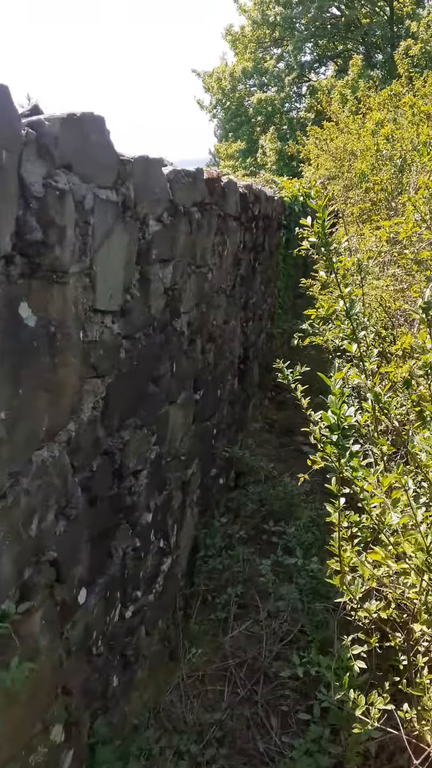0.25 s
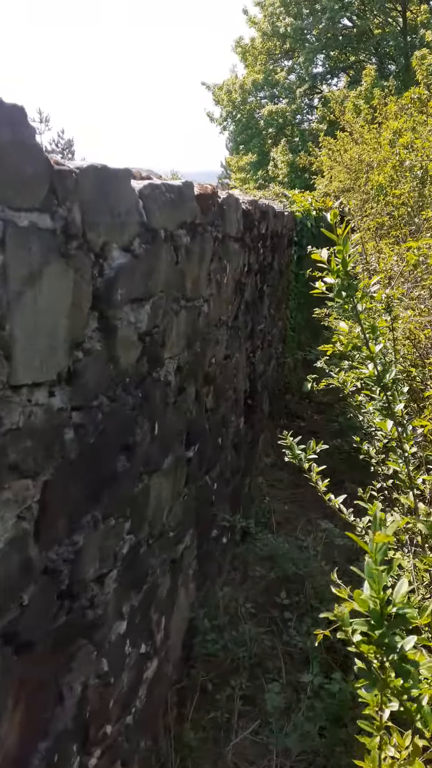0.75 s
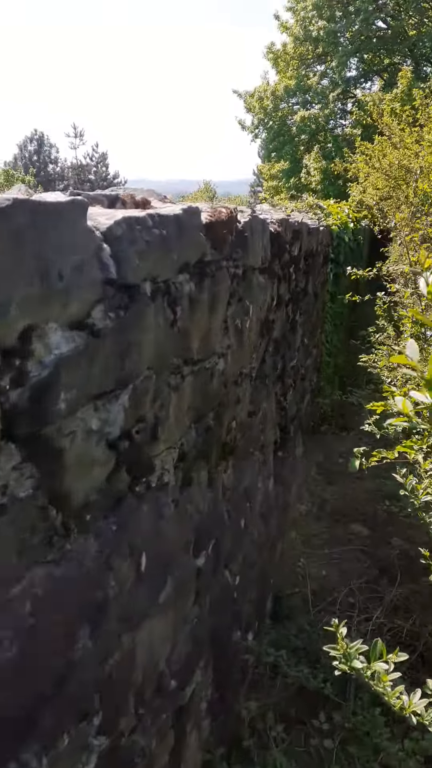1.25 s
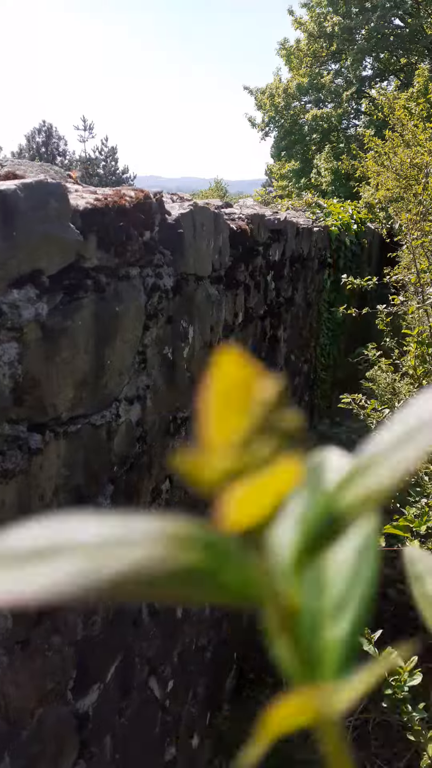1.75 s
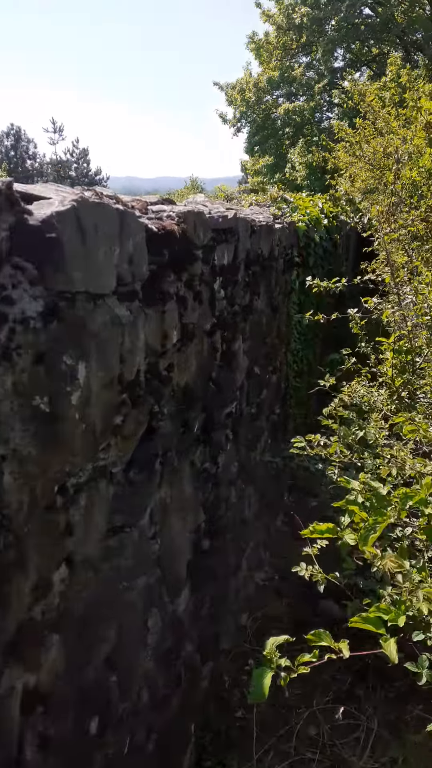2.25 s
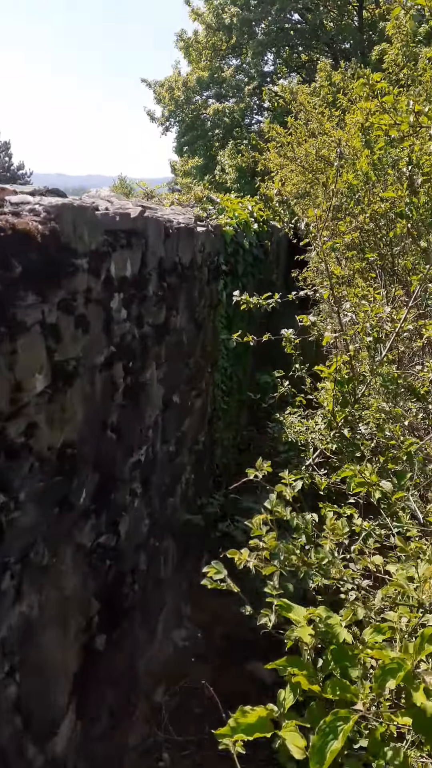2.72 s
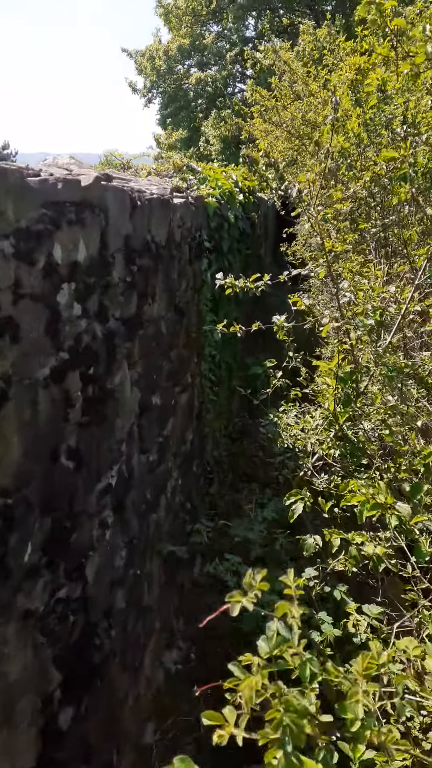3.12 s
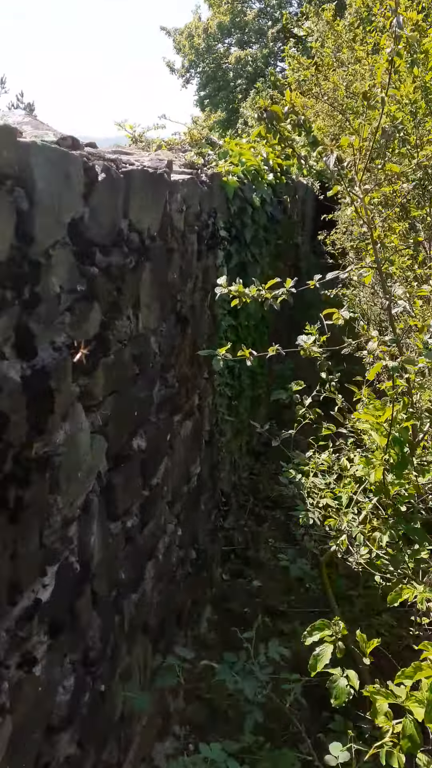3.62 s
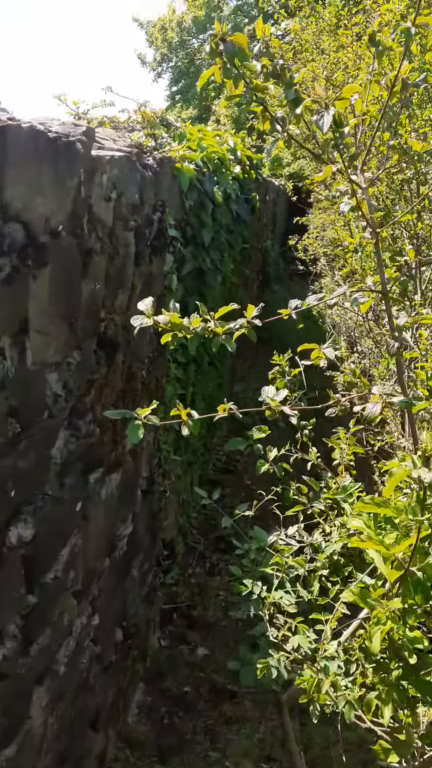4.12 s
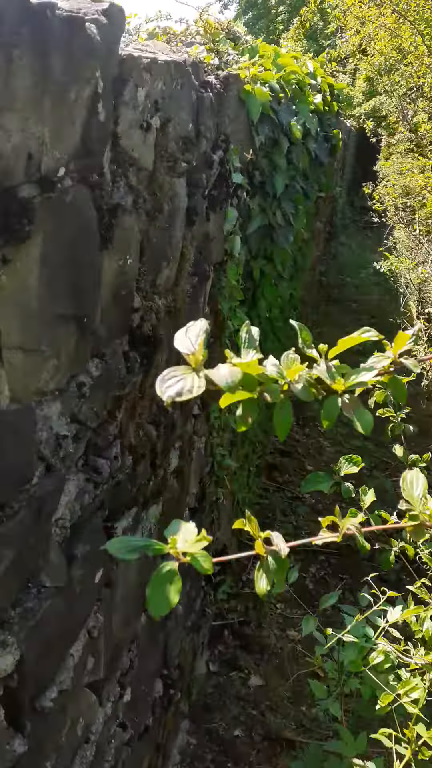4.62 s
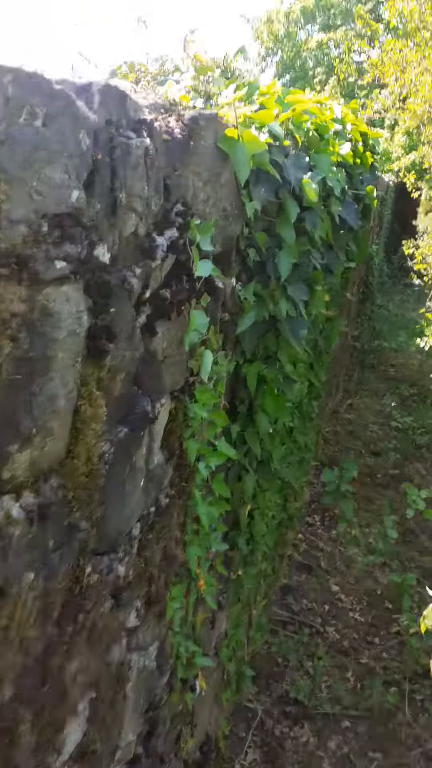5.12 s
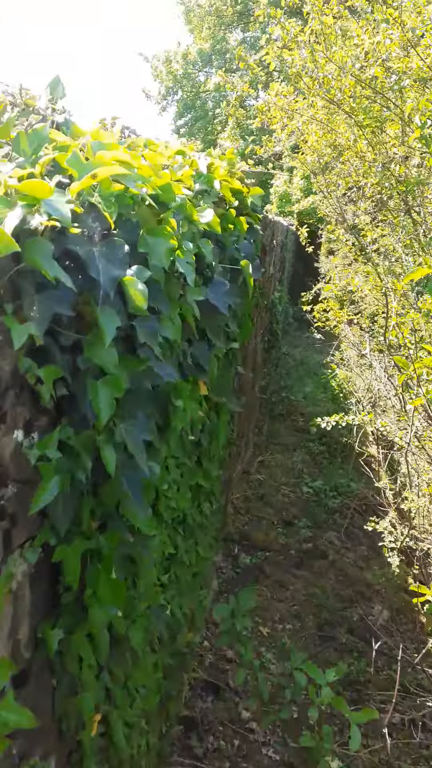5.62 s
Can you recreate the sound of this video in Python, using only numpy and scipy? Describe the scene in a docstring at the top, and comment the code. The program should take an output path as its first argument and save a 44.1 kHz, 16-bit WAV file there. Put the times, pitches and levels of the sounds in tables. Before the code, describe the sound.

A person walks through undergrowth beside a stone wall, heard very close and dry on a handheld camera, stronger at the right. It begins quietly, with a brief leaf brush, tiny ticks and a soft step at 0.25 s over a faint airy murmur and barely audible low, wavering hum. At 0.9 s a shoot hits the camera with a short hard pop and light leaf swish. Rustling swells around 1.5 s, with a bright twig flick at 1.6, then eases. From 2.5 s dull footfalls, crunching dry grass, leaf hiss and woody knocks thicken, with faint scraping stems near 2.7 and 3.5. A leafy sweep comes at 3.9 and a heavier crunching step at 4.5. At 5.03 s comes the loudest moment: a tight cluster of knocks with harsh leafy clatter, over within about a tenth of a second. Brushing, sharp twig flicks at 5.2 and 5.5, low stick knocks and short scrapes continue to the end, near 5.9 s.

```python
"""Undergrowth along a stone wall

Someone pushes through undergrowth along a stone wall, camera in hand, heard at its two microphone ports.
Footfalls bump soft litter and crush dry grass, and leafy shoots drag over clothing: shaped noise and grains.
Twigs tick and sticks knock as decaying bursts; stems scrape as gliding narrow bands of noise.
Twice a shoot whips the camera, the second time in a clatter: pressure spikes with splashes of leaf noise.
The walk lies closer to the right port; a faint murmur and a far hum stand behind it."""
import sys
import numpy as np
from scipy import signal
from scipy.fft import rfft, irfft, next_fast_len
from scipy.io import wavfile
from scipy.ndimage import uniform_filter1d, map_coordinates

SR = 44100
rng = np.random.default_rng(int(sys.argv[2]) if len(sys.argv) > 2 else 0)


def waveform_to_disk(signal):
    """Save audio, clipped to [-1, 1], as 16-bit WAV at the path in sys.argv[1]."""
    frames = np.transpose(np.atleast_2d(signal))
    scaled = np.clip(frames, -1, 1) * 32767
    samples = np.round(scaled).astype(np.int16)
    wavfile.write(sys.argv[1], SR, samples)


N = 258425  # length in samples

# All levels below are relative: each function adds its own trim, then the ports and case colour the sum.
# Thin twigs and leaf edges flicking clear of the rustle: start_s, level_db, pitch_hz, rise_s
TWIG_TICKS = [(.0975, -29, 6500, .0003), (.162, -37, 4400, .0003), (.434, -42, 7500, .002),
              (.468, -49, 7500, .001), (.5013, -44, 14000, .0003), (.6913, -38.5, 7500, 0.00044),
              (0.9646, -25, 9180, .002), (1.0118, -26.5, 3730, 0.00037), (1.629, -13, 7920, 0.0043),
              (1.931, -25, 7520, .004), (2.0263, -27, 6050, 0.0011), (2.045, -34, 6000, .001),
              (2.084, -34, 6000, .001), (2.118, -28.5, 9300, 0.0016), (2.2034, -36, 8380, .0003),
              (2.3673, -28, 8650, 0.0018), (2.6218, -22, 8210, 0.0017), (3.3843, -24.5, 15000, 0.00036),
              (3.4226, -31, 8610, .001), (4.0694, -37, 14500, .0003), (4.1275, -21, 7190, .003),
              (4.9518, -24, 14200, 0.00044), (5.202, -14.5, 9020, 0.0042), (5.3887, -22.5, 6260, 0.00038),
              (5.488, -18, 9010, 0.0038)]
# Sticks knocking underfoot, and near 2.78 s a quick crunch of dry grass given as three bursts: start_s,
# level_db, brightness_db (crack against push)
STICK_KNOCKS = [(0.012, -49, 8), (1.259, -47.5, -0.5), (1.291, -41.5, -1), (1.685, -44.5, 10),
                (2.1, -42.5, 8), (2.542, -37, 7), (2.652, -35.5, 2), (2.731, -28, -4.5),
                (2.781, -37.5, 5.5), (2.792, -30, 4), (2.802, -28.5, 1.5), (3.317, -34.5, 2),
                (3.385, -34.5, 1), (3.554, -33, -4), (3.57, -32, -3), (4.278, -28.5, -2.5),
                (4.483, -26, 1.5), (4.916, -34, 9.5), (4.982, -30, 8.5), (5.379, -40.5, 11.5),
                (5.388, -36, 10), (5.632, -24, -7.5), (5.805, -22.5, -8.5)]
# Shoots whipping the camera: start_s, push_level_db, push_width_s, splash_level_db, splash_t60_s
CAMERA_SLAPS = [(0.923, -29.5, 0.00016, -24.5, 0.025), (.926, -6, .00008, -24.5, 0.011),
                (5.0225, -44, .0002, -20.5, 0.026), (5.0394, -5, 0.00011, -5, .009),
                (5.0423, -29, 0.00023, -14, .006), (5.048, -13.5, 0.00047, -5.5, 0.011),
                (5.068, -14, 0.00045, -7.5, 0.012), (5.1002, -45.5, .00023, -24.5, 0.036)]
# Stems scraping along a boot: start_s, length_s, start_pitch_hz, end_pitch_hz, level_db
STEM_SCRAPES = [(.62, 0.26, 1620, 1685, -64), (1.36, .1, 1550, 1690, -56), (2.701, 0.041, 845, 703, -42.5),
                (3.521, 0.13, 1050, 960, -50.5), (3.623, 0.1, 1200, 1715, -49),
                (5.654, 0.049, 1125, 1360, -39), (5.681, 0.064, 595, 645, -37.5),
                (5.688, 0.058, 1507, 1900, -37)]
# Steady rustle, growing as the undergrowth closes in and sinking between strides: time_s, level_db
RUSTLE_LEVEL = [(0, -73), (.2, -69), (.66, -73), (.88, -64), (1.09, -73), (1.33, -66.5), (1.58, -51),
                (1.99, -59.5), (2.66, -48.5), (2.87, -61), (3.12, -60), (3.66, -52), (3.8, -55.5),
                (4.1, -49), (4.38, -51.5), (4.97, -48), (5.27, -54), (5.86, -48.5)]
# Footsteps: start_s, time_under_load_s, crushed_grass_level_db, ground_level_db
FOOTSTEPS = [(.25, 0.21, -80, -63), (.88, .14, -64, -53.5), (1.52, 0.058, -58, -49.5),
             (2.25, 0.03, -59, -55), (2.53, .27, -49.5, -49.5), (2.93, 0.1, -49, -55),
             (3.55, 0.14, -50.5, -52), (3.91, .26, -50.5, -50), (4.46, 0.15, -40, -40.5),
             (4.95, 0.12, -39.5, -40), (5.29, 0.24, -52.5, -50.5), (5.62, 0.22, -49.5, -46.5)]
# Leafy branches dragging over clothing: start_s, length_s, leaf_level_db, dry_stalk_level_db
BRANCH_BRUSHES = [(0, 0.083, -49.5, -57), (0.72, 0.078, -60.5, -68), (0.882, 0.026, -44.5, -48.5),
                  (0.952, .05, -54, -69), (1.4, 0.12, -50.5, -59), (1.558, 0.022, -40.5, -49),
                  (1.676, 0.094, -54, -66), (2.342, 0.28, -56, -72), (2.58, 0.21, -54, -56),
                  (2.946, 0.083, -58, -63), (3.171, 0.049, -54, -53), (3.32, .07, -55, -53),
                  (3.496, 0.026, -45, -46), (3.58, 0.12, -54.5, -53), (3.902, 0.13, -42.5, -55),
                  (4.469, .16, -42.5, -53), (4.715, 0.1, -53.5, -43.5), (5.025, 0.042, -34, -45),
                  (5.517, 0.044, -47, -43), (5.638, 0.095, -45, -40.5)]
# Spectrum of leaves on cloth: frequency_hz, density_db (per Hz)
LEAF_SPECTRUM = [(300, -7.5), (900, -11.5), (1600, 0), (2200, -3.5), (2900, -3), (3700, -4.5), (4650, -0.5),
                 (5250, -0.5), (6050, 0.5), (6800, -1.5), (7900, 1.5), (9300, -3), (10100, -6),
                 (12500, -1.5), (16000, -5)]
# Spectrum of breaking dry grass: frequency_hz, density_db (per Hz)
GRASS_SPECTRUM = [(150, -33.5), (450, -10.5), (650, -1.5), (950, -2), (1400, -3), (1950, -4), (2400, -8),
                  (3000, -7.5), (4200, -10), (9000, -46)]
# Spectrum of soft litter underfoot: frequency_hz, density_db (per Hz)
GROUND_SPECTRUM = [(20, -32), (45, -17.5), (100, -7.5), (122, -6), (145, -8), (170, -6.5), (245, -1),
                   (290, 0.5), (342, 2), (405, -8.5), (480, -8.5), (700, -16.5), (1500, -27), (4000, -68)]
# Spectrum of a cracking stick: frequency_hz, density_db (per Hz)
WOOD_SPECTRUM = [(150, -24), (400, -2), (700, 1.5), (1100, 1), (1900, 0), (2700, -9.5), (4500, -14),
                 (9000, -30)]
# Spectrum of the open country: frequency_hz, density_db (per Hz)
AIR_SPECTRUM = [(20, -13), (90, -7.5), (200, -6), (340, -4.5), (500, -0.5), (820, -3.5), (1100, -9),
                (1650, -13.5), (2150, -40), (2900, -38), (4200, -31), (6500, -25), (16000, -36)]
# Low resonances rung by knocks and slaps: pitch_hz, width_hz, strength_db
BODY_MODES = [(110.4, 16, -4), (255, 92, -1.5), (326, 63, 5.5), (500, 38, -3), (630, 210, -50)]
# Narrow resonances of the camera case and its ports: pitch_hz, width_hz, strength_db
CASE_MODES = [(103.7, 10.4, -6), (453, 20, -14), (1945, 33, -10), (4590, 69, -8.5), (5920, 130, -7),
              (6200, 46, -4), (7580, 50, -11), (8870, 160, -2), (9360, 120, -6.5)]
# Shading of the far port: frequency_hz, left_minus_right_db
PORT_SHADE = [(60, -9), (120, -9), (350, -4), (700, -5), (1300, -7), (2400, -8), (4400, -9), (8000, -9),
              (15000, -5.5)]
# Likeness of the two ports: frequency_hz, likeness (0-1, no unit)
PORT_LIKENESS = [(100, 1), (500, 0.77), (1000, 0.72), (2000, 0.053), (12000, 0.1)]

PORT_LAG_S = 20 / SR  # the left port hears the direct stream this much later
LOW_CUT_HZ, TOP_HZ = 53, 15950
# share of each layer in the steady rustle
RUSTLE_LEAVES_DB, RUSTLE_GRASS_DB, RUSTLE_GROUND_DB = -.5, -2.5, -4.5
# time for a 20 dB rise, time for a 20 dB fall, growth during the contact
STEP_ATTACK_S, STEP_RELEASE_S, STEP_BUILD_DB = 0.18, 0.12, 3.5  # as the foot rolls on
BRUSH_ATTACK_S, BRUSH_RELEASE_S, BRUSH_BUILD_DB = 0.051, 0.1, 1.5  # as the branch bends
BRUSH_GROUND_DB = -13  # dull rub of the clothing, against the leaves
# lesser ticks: level over the leaves, typical pitch, scatter of pitch
STRAY_TICKS_PER_S, STRAY_TICK_RISE_S = 7, .0006
STRAY_TICK_DB, STRAY_TICK_HZ, STRAY_TICK_OCTAVES = 9.5, 7300, .35
# lesser knocks: level over the grass, brightness
STRAY_KNOCKS_PER_S, STRAY_KNOCK_DB, STRAY_KNOCK_BRIGHT_DB = 8, 9, 2.5
STRAY_SCATTER_DB = 1  # spread in level of the lesser ticks and knocks
SHIVER_DB, SHIVER_T60_S = -4, 0.048  # leaves trembling after a flick
HUM_HZ, HUM_DB, HUM_WAVER_DB = 372.4, -67.5, 3  # pitch, mid level, slow swing


def walk():
    """Levels in dB of leaves, grass and ground: the powers of rustle, footsteps and branches add up."""
    rustle = curve(RUSTLE_LEVEL)
    step = lambda rows: strokes(rows, STEP_ATTACK_S, STEP_RELEASE_S, STEP_BUILD_DB)
    brush = lambda rows: strokes(rows, BRUSH_ATTACK_S, BRUSH_RELEASE_S, BRUSH_BUILD_DB)
    swept = brush([(s, length, db) for s, length, db, _ in BRANCH_BRUSHES])
    bent = brush([(s, length, db) for s, length, _, db in BRANCH_BRUSHES])
    crushed = step([(s, length, db) for s, length, db, _ in FOOTSTEPS])
    trodden = step([(s, length, db) for s, length, _, db in FOOTSTEPS])
    leaf_power = amp(rustle + RUSTLE_LEAVES_DB) ** 2 + swept
    grass_power = amp(rustle + RUSTLE_GRASS_DB) ** 2 + bent + crushed
    clothing_rub = amp(BRUSH_GROUND_DB) ** 2 * swept
    ground_power = amp(rustle + RUSTLE_GROUND_DB) ** 2 + trodden + clothing_rub
    return 10 * np.log10([leaf_power, grass_power, ground_power])


def leaves(sweep_db):
    """Leaves slide over cloth: a hiss with fine crackle in it, swelling wherever an edge flicks."""
    crackle = grains(rate=1400, top_hz=14000, cycles=.8, spread_db=3.5, size=64)
    rub = rng.standard_normal((2, N)) + amp(-4) * crackle
    flutter = np.sqrt(1 + amp(-19) * flicks(rate=170, spread_db=5.5))
    hiss = unit(coloured(rub * flutter, LEAF_SPECTRUM))
    return amp(sweep_db + 4.5 + 1.34 * wobble(60)) * hiss


def grass(crush_db):
    """Dry stalks break in clumps under the sole, the colour shifting from patch to patch."""
    breaks = grains(rate=1000, top_hz=3000, cycles=2, spread_db=2.2, size=300)
    crunch = breaks + amp(3) * rng.standard_normal((2, N))
    clumps = np.sqrt(1 + amp(-15.0) * flicks(rate=60, spread_db=5.0))
    stalks = unit(coloured(patchy(crunch * clumps, depth_db=2.5), GRASS_SPECTRUM))
    return amp(crush_db + 1.0 + 0.41 * wobble(50)) * stalks


def ground(tread_db):
    """Litter gives way in many small dull bumps, over a bed of low noise."""
    bumps = grains(rate=300, top_hz=705, cycles=1.92, spread_db=2, size=1200)
    thud = bumps + amp(13.5) * rng.standard_normal((2, N))
    litter = unit(coloured(thud, GROUND_SPECTRUM))
    return amp(tread_db + 2.0 + 1.2 * wobble(25)) * litter


def ticks(sweep_db):
    """A twig lets go with a click, coloured by its own pitch, and a short shiver of its leaves."""
    clicks, shivers = np.zeros((2, N)), np.zeros((2, N))
    t = np.arange(SR // 16) / SR
    lesser = []
    for s, db in strays(STRAY_TICKS_PER_S, sweep_db + STRAY_TICK_DB):
        hz = STRAY_TICK_HZ * 2 ** (STRAY_TICK_OCTAVES * rng.normal())
        lesser.append((s, db, min(hz, TOP_HZ), STRAY_TICK_RISE_S))
    for s, db, hz, rise_s in TWIG_TICKS + lesser:
        noise = rng.standard_normal((2, len(t)))
        ring = unit(signal.lfilter(*signal.iirpeak(hz, Q=2.6, fs=SR), noise))
        onset = 1 - np.exp(-t / rise_s)
        tremble = fade(t, 0.004) + amp(SHIVER_DB) * fade(t, SHIVER_T60_S)
        add(clicks, s + .001, amp(db - 7) * onset * fade(t, .009) * ring)
        add(shivers, s + .001, amp(db - 11) * onset * tremble * noise)
    return clicks + coloured(shivers, LEAF_SPECTRUM)


def knocks(crush_db):
    """A stick takes the weight: a low push, and a sharp woody crack that splinters on briefly."""
    pushes, cracks = np.zeros((2, N)), np.zeros((2, N))
    t = np.arange(SR // 8) / SR
    lesser = [(s, db, STRAY_KNOCK_BRIGHT_DB)
              for s, db in strays(STRAY_KNOCKS_PER_S, crush_db + STRAY_KNOCK_DB)]
    for s, db, bright_db in STICK_KNOCKS + lesser:
        streams = np.array([[1], [rng.normal()]])  # direct, scattered
        add(pushes, s + .0012, -amp(db + 10) * fade(t, 0.0016) * streams)
        splinter = fade(t, 0.0081) + amp(-5.5) * fade(t, 0.068)
        crack = splinter * rng.standard_normal((2, len(t)))
        add(cracks, s + 0.001187, amp(db + bright_db - 6) * crack)
    return filtered(pushes, body) + coloured(cracks, WOOD_SPECTRUM)


def scrapes():
    """A stem slides over a boot: a narrow rasp whose pitch follows the free length of the stem."""
    track = np.zeros((2, N))
    for s, length, start_hz, end_hz, db in STEM_SCRAPES:
        hz = np.linspace(start_hz, end_hz, int(length * SR))
        grip = np.array([wobble(274) + 1j * wobble(272) for _ in range(2)])[:, :len(hz)]
        carrier = np.exp(2j * np.pi * np.cumsum(hz) / SR)
        rasp = unit((grip * carrier).real)
        add(track, s, amp(db) * np.hanning(len(hz)) * rasp)
    return track


def slaps():
    """A shoot hits beside the right port: a pressure spike, the ring of the case and a splash of leaves."""
    push, splash = np.zeros(N), np.zeros((2, N))
    t = np.arange(SR // 8) / SR
    lead_s, rise_s = .001, .0005
    for s, push_db, width_s, splash_db, t60 in CAMERA_SLAPS:
        add(push, s - lead_s, -amp(push_db) * np.exp(-((t - lead_s) / width_s) ** 2))
        shape = (1 - np.exp(-t / rise_s)) * fade(t, t60)
        add(splash, s, amp(splash_db) * shape * rng.standard_normal((2, len(t))))
    leak_hz = 120  # pressure leaks away, so the spike swings back
    spike = filtered(push, lambda hz: 1j * hz / (leak_hz + 1j * hz))
    ring = amp(-4.5) * filtered(push, body)
    # the leaves dragging over the case shake it as well: frequency_hz, density_db
    shake_spectrum = [(25, -24), (70, -2), (130, -6.0), (220, 5.5), (400, -13.5), (800, -28), (4000, -52)]
    shake = amp(-12.5) * coloured(splash, shake_spectrum)
    drag = ports(coloured(splash, LEAF_SPECTRUM) + shake)
    # gains are left, right
    return spike * amp([[-26], [0]]) + ring * amp([[-10], [0]]) + drag * amp([[-3], [0]])


def air():
    """Faint steady murmur of the open country, with a far, wavering hum in it."""
    sway = np.array([wobble(35) + 1j * wobble(35) for _ in range(2)])
    carrier = np.exp(2j * np.pi * HUM_HZ * np.arange(N) / SR)
    hum = unit((sway * carrier).real)
    murmur = unit(coloured(rng.standard_normal((2, N)), AIR_SPECTRUM))
    return amp(-61.5) * murmur + amp(HUM_DB + HUM_WAVER_DB * wobble(4.3)) * hum


def ports(pair):
    """A direct and a scattered stream to left and right: the left port is late and shaded."""
    direct, scattered = pair
    alike = lambda hz: np.clip(along(PORT_LIKENESS, hz), 0, 1)
    left = filtered(direct, lambda hz: alike(hz) * np.exp(-2j * np.pi * hz * PORT_LAG_S))
    left += filtered(scattered, lambda hz: np.sqrt(1 - alike(hz) ** 2))
    shaded = filtered(left, lambda hz: amp(along(PORT_SHADE, hz)))
    return np.array([shaded, direct])


def strokes(rows, attack_s, release_s, build_db):
    """Summed power of (start_s, length_s, level_db) contacts: each sets in, builds and lets go."""
    t, power = np.arange(N) / SR, np.zeros(N)
    for s, length, db in rows:
        outside = np.maximum(s - t, 0) / attack_s + np.maximum(t - s - length, 0) / release_s
        progress = np.clip((t - s) / length, 0, 1)
        power += amp(db + build_db * (progress - 1.0) - 20 * outside) ** 2
    return power


def strays(rate, level_db):
    """Lesser events at random moments, as strong as the movement is just then: start_s, level_db."""
    where = rng.integers(N, size=int(rate * N / SR))
    return [(i / SR, level_db[i] + STRAY_SCATTER_DB * rng.normal()) for i in where]


def grains(rate, top_hz, cycles, spread_db, size):
    """Two streams of tiny fractures, each a damped sine of its own pitch and strength."""
    draw = rng.random((int(rate * N / SR), 5))  # moment, pitch, strength, two phases
    hz = top_hz * (draw[:, 1:2] + .05)
    turns = hz * np.arange(size) / SR
    strength = amp(spread_db * np.minimum(-np.log(draw[:, 2:3]), 4)) * np.sqrt(hz)
    shape = strength * np.exp(-turns / cycles)
    where = ((draw[:, :1] * N).astype(int) + np.arange(size)).ravel()
    streams = []
    for phase in draw.T[3:]:
        sines = shape * np.sin(2 * np.pi * (turns + phase[:, None]))
        streams.append(np.bincount(where, sines.ravel(), N)[:N])
    return unit(np.array(streams))


def flicks(rate, spread_db):
    """Power envelope, of mean 1, of edges flicking at random moments, each fading over 20 ms."""
    draw = rng.random((int(rate * N / SR), 2))  # moment, strength
    sizes = amp(spread_db * np.minimum(-np.log(draw[:, 1]), 3.5)) ** 2
    blows = np.bincount((draw[:, 0] * N).astype(int), sizes, N)
    decay = fade(np.arange(SR // 50) / SR, 0.029)
    power = np.abs(signal.fftconvolve(blows, decay)[:N])
    return power / power.mean()


def patchy(x, depth_db):
    """Short-lived resonances: every patch of time and pitch gets its own gain."""
    z = signal.stft(x, nperseg=512)[2]
    field = uniform_filter1d(rng.standard_normal(z.shape[1:]), size=3, axis=0)  # across pitch
    field = uniform_filter1d(field, size=7, axis=1)  # across time
    return signal.istft(z * amp(depth_db * unit(field)), nperseg=512)[1][:, :N]


def resonances(hz, table):
    """Complex response of a set of pitch_hz, width_hz, strength_db resonances."""
    return sum(amp(db) * 1j * hz * w / (c * c - hz * hz + 1j * hz * w) for c, w, db in table)


def body(hz):
    """Response of the low resonances that knocks and slaps ring."""
    return resonances(hz, BODY_MODES)


def coloured(x, spectrum, size=4096):
    """Causal minimum-phase filter with the given spectrum; white noise keeps its power."""
    gain = unit(amp(along(spectrum, np.fft.rfftfreq(size, 1 / SR))))
    cepstrum = irfft(np.log(gain + 1e-6))
    cepstrum[1:size // 2] *= 2  # fold onto positive time
    cepstrum[size // 2 + 1:] = 0
    impulse = irfft(np.exp(rfft(cepstrum)))
    return signal.fftconvolve(x, impulse[None], axes=1)[:, :N]


def filtered(x, response):
    """x times a complex response of frequency."""
    size = next_fast_len(N + SR // 2)
    return irfft(rfft(x, size) * response(np.fft.rfftfreq(size, 1 / SR)), size)[..., :N]


def amp(db):
    """Decibels to gain."""
    return 10 ** (np.asarray(db) / 20)


def unit(x):
    """Scale to rms 1."""
    return x / np.sqrt(np.mean(x ** 2) + 1e-20)


def along(points, hz):
    """Values at hz from (frequency_hz, value) points on a log axis."""
    f, v = np.transpose(points)
    return np.interp(np.log(hz + 1), np.log(f + 1), v)


def curve(rows):
    """One value per sample from (time_s, value) rows."""
    return np.interp(np.arange(N) / SR, *np.transpose(rows))


def wobble(rate):
    """A smooth random curve, rate knots a second."""
    knots = rng.standard_normal(int(N * rate / SR) + 4)
    return map_coordinates(knots, [np.arange(N) * rate / SR])


def fade(t, t60):
    """Exponential decay, 60 dB in t60 seconds."""
    return np.exp(-np.log(1000) * t / max(t60, 1e-4))


def add(track, s, sound):
    """Mix a short sound into a track at time s."""
    part = track[..., max(round(s * SR), 0):][..., :sound.shape[-1]]
    part += sound[..., :part.shape[-1]]


def scene():
    """The walker's sounds and the air reach the ports; the slaps land on the camera itself."""
    sweep_db, crush_db, tread_db = walk()
    walker = leaves(sweep_db) + grass(crush_db) + ground(tread_db)
    walker += ticks(sweep_db) + knocks(crush_db) + scrapes()
    return ports(walker + air()) + slaps()


def record(dry):
    """The camera's case colours the sound; the deep bass and everything above the band limit are lost."""
    low_cut = signal.butter(3, LOW_CUT_HZ, "highpass", fs=SR, output="sos")
    cased = filtered(dry, lambda hz: 1 + resonances(hz, CASE_MODES))
    sound = signal.sosfilt(low_cut, cased)
    return filtered(sound, lambda hz: hz < TOP_HZ)


dry = scene()
out = record(dry)
waveform_to_disk(out)
```